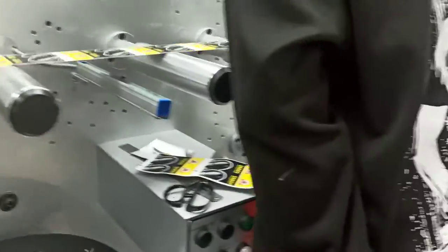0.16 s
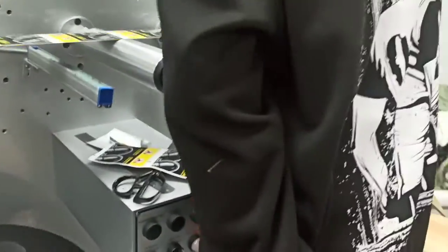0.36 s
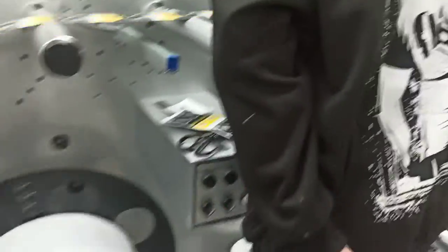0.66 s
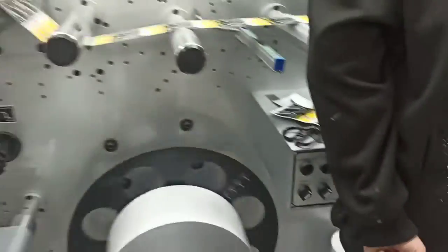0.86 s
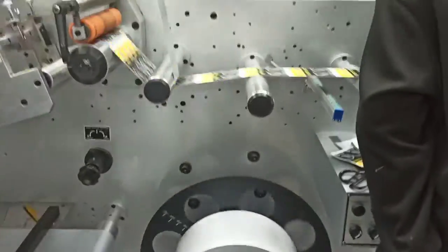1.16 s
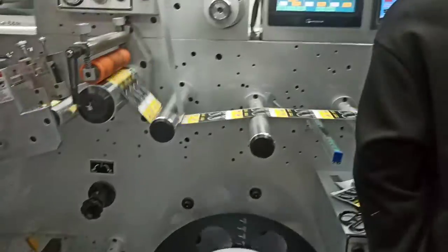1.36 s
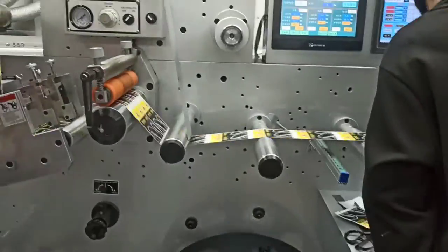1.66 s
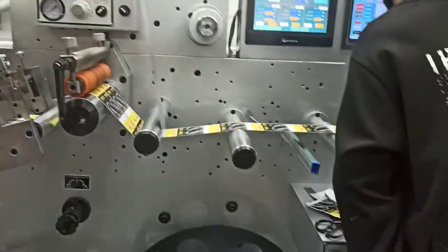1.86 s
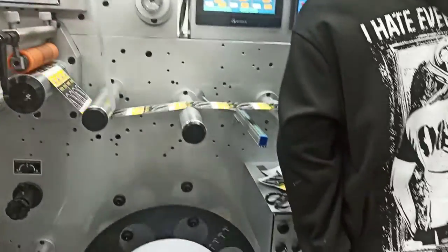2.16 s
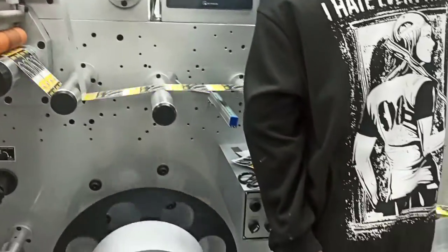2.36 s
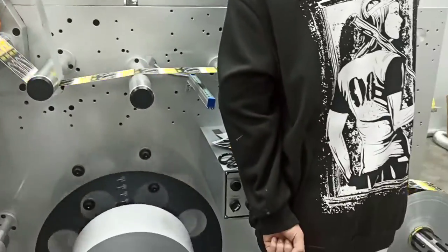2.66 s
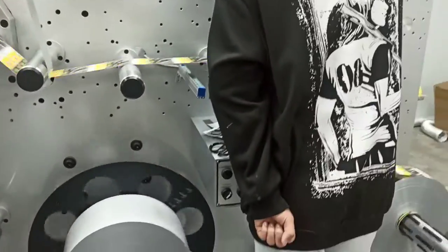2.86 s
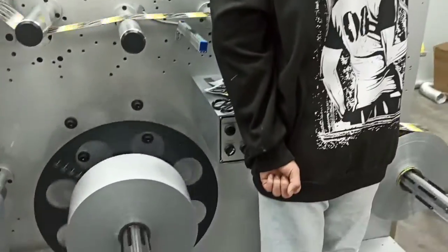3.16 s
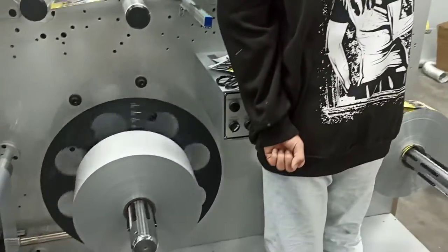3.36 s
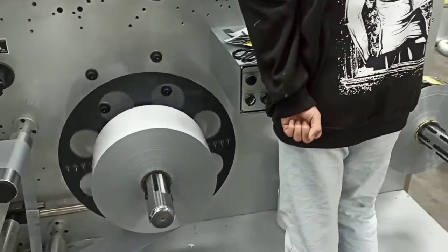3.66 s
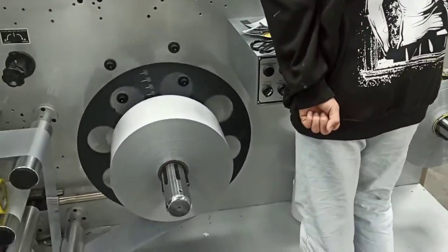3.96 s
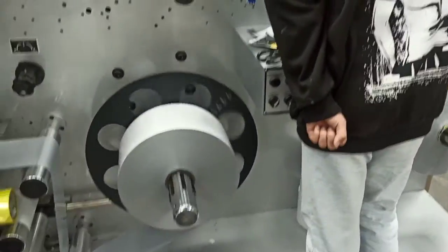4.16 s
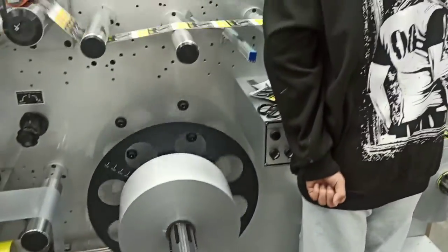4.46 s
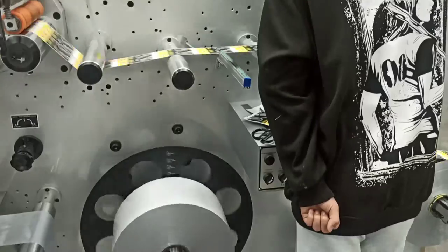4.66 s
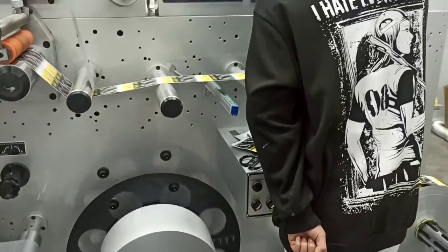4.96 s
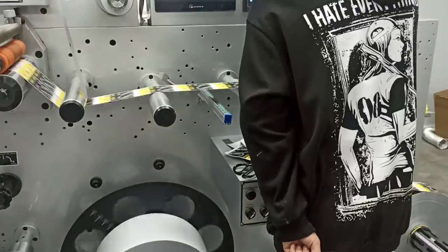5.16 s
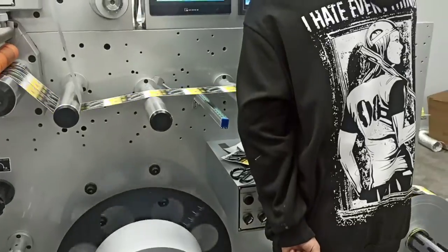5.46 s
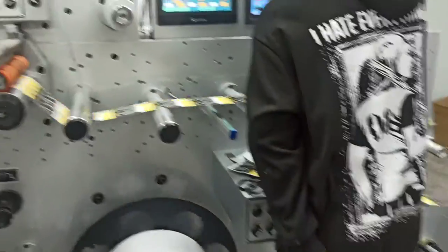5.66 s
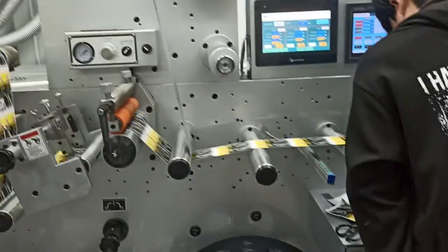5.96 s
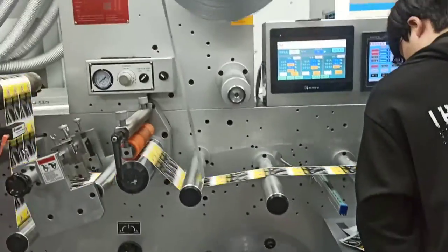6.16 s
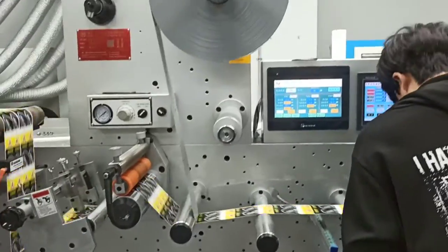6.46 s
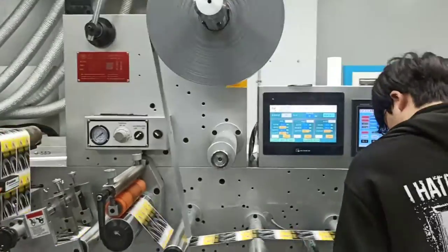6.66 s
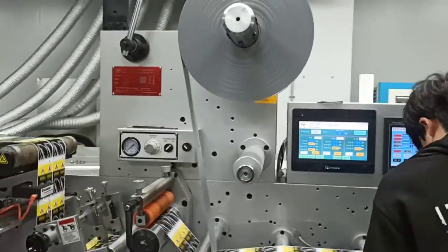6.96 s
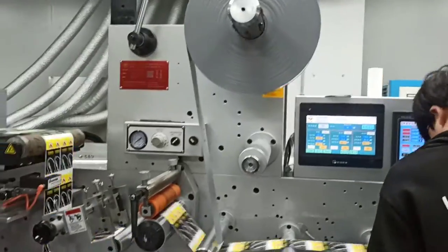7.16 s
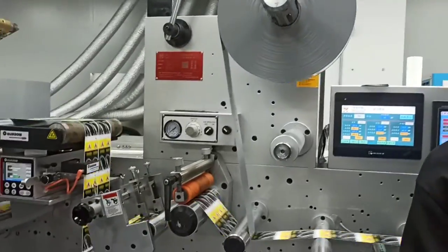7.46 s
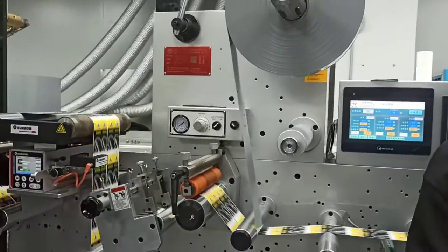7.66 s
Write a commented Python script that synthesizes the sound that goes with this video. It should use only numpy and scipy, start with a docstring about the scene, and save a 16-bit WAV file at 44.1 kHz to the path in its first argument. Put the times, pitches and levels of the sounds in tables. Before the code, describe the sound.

A label press runs steadily in a workshop, its clear mid-pitched blower hum swelling near the middle over rumble, roller whir and soft hiss.

```python
"""One clear note stands out throughout, strongest near the middle: the blower of a label press in a workshop.
The note is a sine plus its reflection, so it swells and fades from place to place at each moving microphone.
Motors and drives drone as wandering sines. The frame's rumble, the rollers' whir and the running web's hiss
are coloured noise. Two soft swishes and one small knock are short bursts of noise."""
import sys
import numpy as np
from scipy import signal
from scipy.fft import rfft, irfft
from scipy.io import wavfile
from scipy.ndimage import uniform_filter1d

SR = 44100
rng = np.random.default_rng(int(sys.argv[2]) if len(sys.argv) > 2 else 0)


def unload_wav(signal):
    """Save mono or channel-first audio to the path in sys.argv[1] as 16-bit WAV at rate SR, clipped to [-1, 1]."""
    wavfile.write(
        sys.argv[1],
        SR,
        np.round(np.clip(np.atleast_2d(signal).T, -1, 1) * 32767).astype(np.int16),
    )


N = 344402

TIME = np.arange(N) / SR  # seconds
HZ = np.maximum(np.fft.rfftfreq(N, 1 / SR), 1)
MIC_SPACING_M, SPEED_OF_SOUND = 0.17, 343  # metres, metres per second
DIRECT_LEAD_MS = 0.32  # the left microphone hears direct noise this much earlier


def from_db(db):
    """Turn decibels into a plain gain."""
    return 10 ** (np.asarray(db) / 20)


def rms_one(x):
    """Scale a signal to an average (RMS) strength of 1."""
    return x / np.sqrt(np.mean(x ** 2) + 1e-20)


def in_time(rows):
    """Join the rows of a table with straight lines: one curve for each column after the time."""
    s, *columns = np.transpose(rows)
    return [np.interp(TIME, s, column) for column in columns]


def pan(left_db):
    """Gains of left and right that differ by left_db; positive is louder on the left."""
    return from_db(np.array([[0.5], [-0.5]]) * left_db)


def bump(s, half_length):
    """A smooth rise to 1 and fall around a moment."""
    return np.exp(-((TIME - s) / half_length) ** 2)


def drift(rate):
    """Smooth chance movement of spread 1, made by low-passing noise twice at rate (Hz)."""
    step = 40  # samples between the slow values
    r = np.exp(-2 * np.pi * rate * step / SR)
    noise = rng.standard_normal(N // step + 2002)
    slow = signal.lfilter([1], [1, -2 * r, r * r], noise)[2000:]  # skip the filter's start
    return np.interp(np.arange(N) / step, np.arange(len(slow)), rms_one(slow))


def colour(points):
    """Gain at every frequency, joined on a log scale; almost silent outside the points."""
    hz, db = np.transpose(points)
    return from_db(np.interp(np.log(HZ), np.log(hz), db, left=-90, right=-90))


def diffuse(gain, direct=0.046):
    """Coloured noise from all round, alike at both microphones only in long waves, plus a direct share."""
    alike = 0.98 * np.sinc(2 * HZ * MIC_SPACING_M / SPEED_OF_SOUND)
    mid, side, straight = rfft(rng.standard_normal((3, N)))
    mid = mid * np.sqrt((1 + alike) / 2)
    side = side * np.sqrt((1 - alike) / 2)
    hall = np.array([mid + side, mid - side])
    late = np.exp(-2j * np.pi * HZ * DIRECT_LEAD_MS / 1000)
    near = np.array([straight, straight * late])
    mixed = np.sqrt(1 - direct) * hall + np.sqrt(direct) * near
    return rms_one(irfft(gain * mixed, N))


def resonance(hz, width_hz):
    """Noise held in one narrow resonance; its gain is halved width_hz away from the centre."""
    return diffuse(1 / (1 + ((HZ - hz) / width_hz) ** 2), direct=0.52)


def tone(hz, db, wander_rad=0.77, spread=0.32):
    """A sine with a wandering phase; short waves differ more between the microphones."""
    phase = 2 * np.pi * (hz * TIME + rng.random()) + wander_rad * drift(0.85)
    apart = np.pi * hz * MIC_SPACING_M / SPEED_OF_SOUND * spread * drift(0.37)
    return np.sqrt(2) * from_db(db) * np.sin([phase + apart, phase - apart])


RUMBLE_DB = -21  # middle of the throb
# colour of the frame's rumble: (f/Hz, relative level/dB)
RUMBLE_COLOUR = [(20, -40), (45, -25), (65, -24.5), (100, -7), (125, -5), (155, 1.5), (190, -3), (235, -6),
                 (280, 2), (320, -6.5), (370, -1), (470, -6), (570, -6.5), (680, -24.5)]


def frame(throb_db=0.55, throb_hz=7.1, left_db=-3.5):
    """The frame's low noise throbs lightly with each turn of the rollers."""
    throb = throb_db * np.sin(2 * np.pi * throb_hz * TIME)
    rumble = diffuse(colour(RUMBLE_COLOUR), direct=0.32)
    return from_db(RUMBLE_DB + throb) * rumble * pan(left_db)


# colour of the running web's hiss: (f/Hz, relative level/dB)
HISS_COLOUR = [(1900, -27), (2400, -3), (2800, -2), (3600, -0.5), (4700, -1.5), (4850, -8.5), (6000, -8.5),
               (6200, -1.5), (6800, -1), (7000, -5), (7600, -1), (7750, -6.5), (8500, -8), (8750, -50)]
# colour of the top band of the hiss: (f/Hz, relative level/dB)
TOP_HISS_COLOUR = [(11350, -48), (11650, -2), (12300, -2.5), (13200, -0.5), (15500, 0)]
# nearness of the web, before flutter: (t/s, level/dB, left minus right/dB)
WEB_NEARNESS = [(0, -28.5, -5), (.9, -28.5, -2.5), (2.5, -29.5, -3.5), (4.7, -28, -3), (5.5, -29, -2),
                (6.2, -28, -1.9), (7.81, -27.5, -2.5)]
# level and side of the top hiss over time, before flutter: (t/s, level/dB, left minus right/dB)
TOP_HISS_LEVEL = [(0, -41.5, -3), (.55, -41.5, -4), (.9, -39.5, 0), (2.2, -41.8, -2.5), (3.4, -39, -3),
                  (5.3, -40.5, -3), (6.2, -39.4, -1), (7.2, -39.9, -.7), (7.81, -39, .5)]


def web(hiss_flutter_db=0.44, top_flutter_db=0.9):
    """The label web hisses over the rollers under its own thin top; both flutter by chance."""
    hiss_db, hiss_left_db = in_time(WEB_NEARNESS)
    top_db, top_left_db = in_time(TOP_HISS_LEVEL)
    hiss = from_db(hiss_db + hiss_flutter_db * drift(22)) * diffuse(colour(HISS_COLOUR))
    top = from_db(top_db + top_flutter_db * drift(22)) * diffuse(colour(TOP_HISS_COLOUR))
    return hiss * pan(hiss_left_db) + top * pan(top_left_db)


WHIR_DB = -23.5  # before the roughness
# colour of the rolling noise: (f/Hz, relative level/dB)
WHIR_COLOUR = [(500, -26.5), (620, -0.5), (780, 0), (900, -0.5), (1050, -5), (1200, -4.5), (1370, -4),
               (1500, -5.5), (1950, -6), (2300, -11.5), (2800, -30.5)]
# narrow resonances of the bearings: (f/Hz, half width/Hz, level/dB)
BEARING_RINGS = [(581, 9.8, -37.5), (872, 8.4, -43)]
# faint ring of a hollow roller: (f/Hz, half width/Hz)
HOLLOW_ROLLER = (1312, 20)
# strength of that ring: (t/s, level/dB)
HOLLOW_ROLLER_LEVEL = [(0, -39), (.55, -44), (1, -31), (1.6, -39), (3.2, -36.5), (4.3, -31.5), (4.9, -38.5),
                       (7.81, -35)]


def rollers(rough_db=0.5, left_db=-3.8):
    """Rolling makes broad noise, with a few narrow resonances of roller and bearings standing out."""
    whir = from_db(WHIR_DB + rough_db * drift(25)) * diffuse(colour(WHIR_COLOUR), direct=0.23)
    ring_db, = in_time(HOLLOW_ROLLER_LEVEL)
    ring = from_db(ring_db) * resonance(*HOLLOW_ROLLER)
    bearings = sum(from_db(db) * resonance(hz, width_hz) for hz, width_hz, db in BEARING_RINGS)
    return (whir + ring + bearings) * pan(left_db)


# the web touches a guide: (t/s at the loudest, half length/s, level/dB)
GUIDE_BRUSHES = [(1.63, 0.05, -33), (6.17, 0.098, -32.5)]


def brushes():
    """Short soft swishes of high noise as the web touches a guide."""
    swell = sum(from_db(db) * bump(s, half_length) for s, half_length, db in GUIDE_BRUSHES)
    # frequency in Hz, relative level in dB
    swish_colour = [(4000, -20), (6300, 1), (7600, -2), (8700, -18), (8900, -50)]
    return swell * diffuse(colour(swish_colour))


# one light knock: (t/s, starting level/dB, time to fall by 60 dB/s)
KNOCK = (3.408, -27, .16)
# colour of the knock: (f/Hz, relative level/dB)
KNOCK_COLOUR = [(900, -22), (1800, 0), (3200, -3), (5000, -23)]


def tick():
    """A small knock in the mechanism: noise that starts at once and dies away in the hall."""
    s, db, t60 = KNOCK
    fall_db = 60 * np.abs(TIME - s) / t60
    return (TIME > s) * from_db(db - fall_db) * diffuse(colour(KNOCK_COLOUR))


# steady tones of motors and mains, before the shared lift and swell: (f/Hz, level/dB)
MOTOR_TONES = [(72, -42), (79.4, -52.5), (119.8, -38), (135.3, -38), (199.9, -35.5), (216.7, -41),
               (255.7, -37), (287.3, -41), (436, -35.5), (730.8, -43), (1368.7, -52.5), (3501.2, -49.5),
               (3601.4, -51.5)]
# gear and drive tones, each with one loudest spot, before shimmer:
# (f/Hz, level elsewhere/dB, spot passed at t/s, half length/s, rise/dB)
DRIVE_TONES = [(265.8, -39.5, 3.1, 0.7, 10), (290.2, -35, 4.9, 1.7, 3), (385, -40.5, 7.1, .9, 12.5),
               (576, -43.5, 0.57, 0.91, 9.5), (866, -42.5, 2.25, .5, 8), (976.2, -45.5, 4.6, 0.42, 9.5)]


def motors(lift_db=0.5, swell_db=2.5, shimmer_db=2.5, left_db=-5.5):
    """Tones swell by chance; each drive tone also rises as the microphones pass its loudest spot."""
    drone = 0
    for hz, db in MOTOR_TONES:
        drone = drone + tone(hz, db + lift_db + swell_db * drift(0.79))
    for hz, db, s, half_length, rise_db in DRIVE_TONES:
        passing_db = rise_db * bump(s, half_length)
        drone = drone + tone(hz, db + passing_db + shimmer_db * drift(1.2))
    return drone * pan(left_db)


BLOWER_HZ = 488.1
# the reflected wave as a share of the arriving one; gap of the microphones along the wave in metres
REFLECTED_SHARE, GAP_ALONG_WAVE_M = 0.58, 0.11
# the microphones' path through the standing wave:
# (t/s, level of the arriving note before trim and flutter/dB, distance of their midpoint from a crest/m)
MICROPHONE_PATH = [(0.0, -18.0, -0.29), (0.59, -15, -0.19), (0.83, -22.5, -0.15), (1.26, -28.5, 0.0051),
                   (1.36, -28, -0.13), (2.01, -25, -0.16), (2.2, -22, -0.053), (3.09, -16, -0.04),
                   (3.58, -14.6, -0.026), (4.06, -14, -0.041), (4.41, -18.7, -0.056), (5.47, -19, -0.065),
                   (5.76, -23.5, -0.019), (6.67, -23, 0.11), (6.98, -23, 0.08), (7.49, -26.7, 0.12),
                   (7.81, -27.1, 0.16)]


def blower(trim_db=-0.25, left_db=-3.3, lead_rad=0.09, wobble_rad=0.05, wander_rad=0.3, flutter_db=1.0):
    """A clean note meets its reflection off the machine's front; each microphone hears both waves summed."""
    level_db, place_m = in_time(MICROPHONE_PATH)
    mic_place_m = place_m + GAP_ALONG_WAVE_M * np.array([[-0.5], [0.5]])
    travel = 2 * np.pi * BLOWER_HZ / SPEED_OF_SOUND * mic_place_m
    unsteady = wobble_rad * drift(8) + wander_rad * drift(0.32)
    lead = lead_rad * np.array([[0.5], [-0.5]])  # left is slightly ahead
    phase = 2 * np.pi * BLOWER_HZ * TIME + unsteady + lead
    waves = np.sin(phase + travel) + REFLECTED_SHARE * np.sin(phase - travel)
    strength = from_db(level_db + trim_db + flutter_db * drift(22))
    return np.sqrt(2) * strength * waves * pan(left_db)


def scene():
    """All parts of the running press, from the background to the main note."""
    return frame() + web() + rollers() + brushes() + tick() + motors() + blower()


# above the threshold, this share of the excess is taken off; loudness is averaged over the window
GAIN_THRESHOLD_DB, GAIN_SHARE, GAIN_WINDOW_S = -13, 0.48, 0.15
CUTOFF_HZ = 15600


def record(dry):
    """The recorder turns each channel down while it is loud and cuts the top steeply."""
    power = uniform_filter1d(dry ** 2, int(GAIN_WINDOW_S * SR), axis=1)
    level_db = 10 * np.log10(power + 1e-12)
    excess_db = np.maximum(level_db - GAIN_THRESHOLD_DB, 0)
    held = dry * from_db(-GAIN_SHARE * excess_db)
    top_cut = signal.ellip(10, 0.1, 90, CUTOFF_HZ, fs=SR, output="sos")
    return signal.sosfilt(top_cut, held)


dry = scene()
out = record(dry)
unload_wav(out)
```